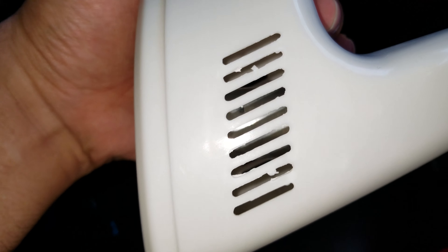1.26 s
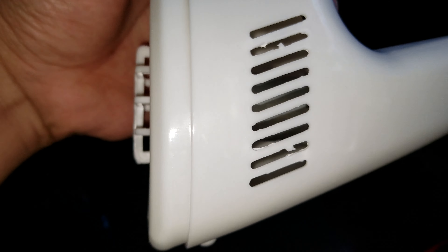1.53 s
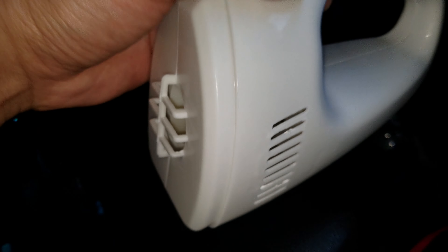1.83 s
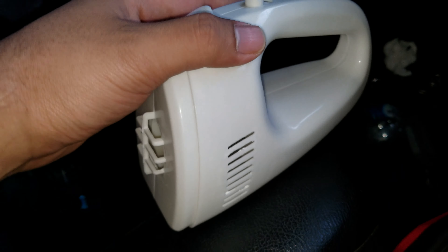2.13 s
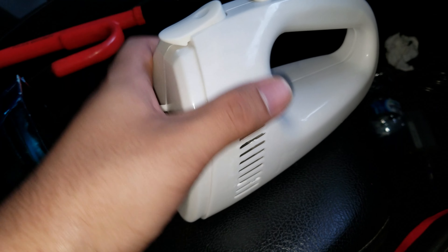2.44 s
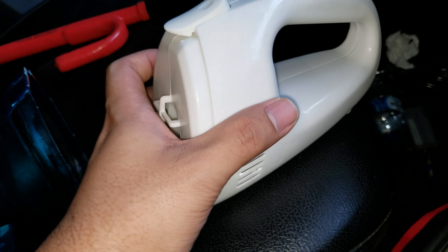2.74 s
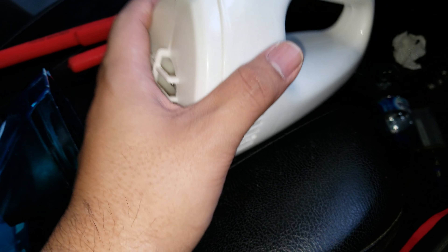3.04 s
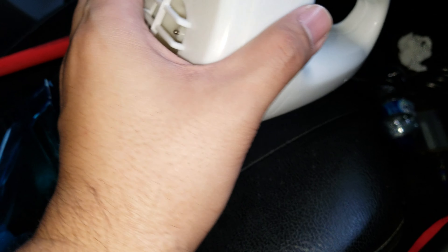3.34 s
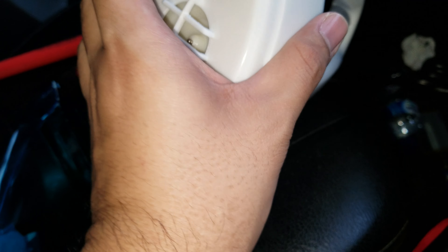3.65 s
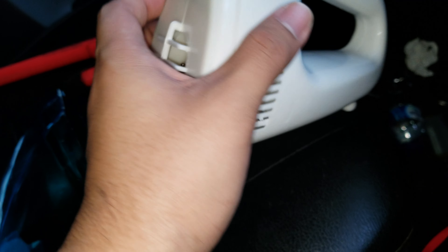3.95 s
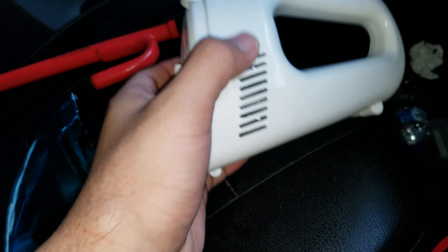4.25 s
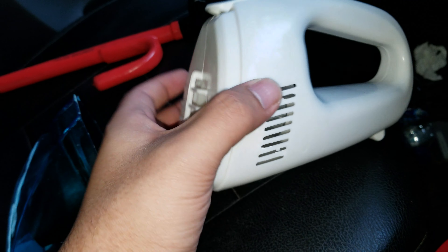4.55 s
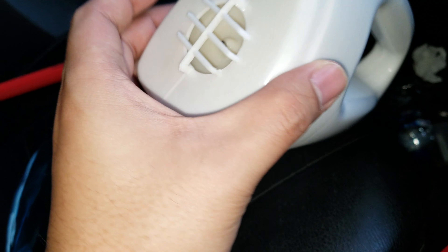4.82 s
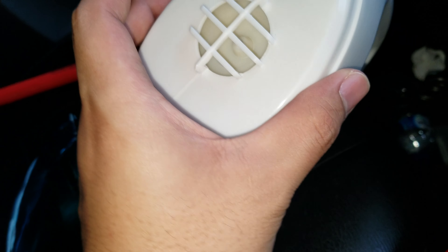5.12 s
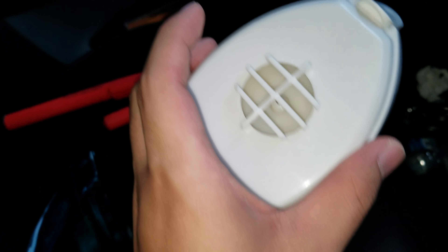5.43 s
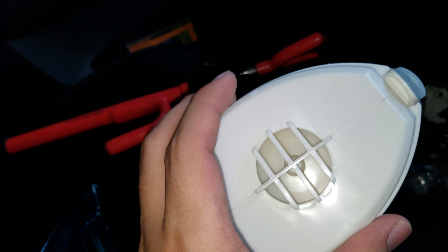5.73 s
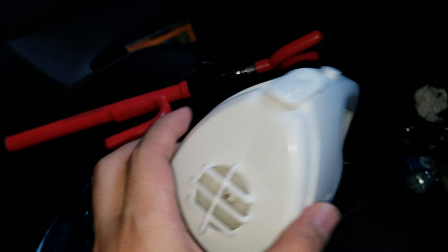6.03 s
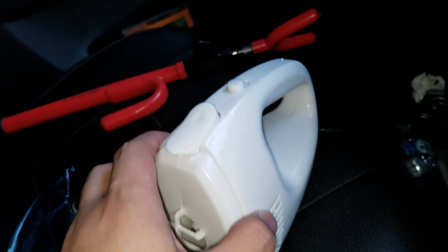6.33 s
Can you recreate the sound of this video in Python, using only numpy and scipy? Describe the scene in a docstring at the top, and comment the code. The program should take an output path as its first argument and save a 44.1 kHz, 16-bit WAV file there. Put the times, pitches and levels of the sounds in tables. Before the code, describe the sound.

A small handheld vacuum cleaner runs with rushing air and a high whine, then switches off and winds down.

```python
"""Rushing air and a high whine come from a small handheld vacuum cleaner in a parked car.
Its fan whistles and its motor hums, swelling and fading as a hand turns it near the microphone.
At first the exhaust blows across the microphone; now and then the plastic ticks in the grip.
Switched off, it coasts down: the rush dies, the motor's brushes scrape on and its tones
slide down through the pitches at which the plastic shell rings."""
import sys
import numpy as np
from scipy import signal
from scipy.fft import rfft, irfft, next_fast_len
from scipy.io import wavfile
from scipy.ndimage import uniform_filter1d

SR = 44100
rng = np.random.default_rng(int(sys.argv[2]) if len(sys.argv) > 2 else 0)


def persist_wave(psi):
    """Save psi, clipped to +-1, as 16-bit WAV."""
    counts = np.round(np.clip(psi, -1, 1) * 32767).astype(np.int16)
    wavfile.write(sys.argv[1], SR, np.atleast_2d(counts).T)


N = 435266
T = np.arange(N) / SR
PADDED = next_fast_len(N, True)
FREQ = np.maximum(np.arange(PADDED // 2 + 1) * SR / PADDED, 1)
FULL_HZ = 347.4  # turns a second of the motor's shaft at full speed

# how well the plastic shell gives off each pitch: pitch_hz, gain_db
SHELL = [(60, -24), (185, -20), (215, -18), (238, -5), (262, 1), (300, -3), (350, -10), (410, -15),
         (500, -14), (560, -19), (630, -5), (730, 1), (785, -2), (850, -20), (930, -19), (1050, -6),
         (1160, 2), (1240, -5), (1320, 3), (1380, -8), (1500, -23), (6000, -38)]


def from_db(db):
    """Turn decibels into a factor to multiply by."""
    return 10 ** (np.asarray(db) / 20)


def curves(table):
    """Join a table's rows by straight lines in time, one curve for each value column."""
    times, *columns = np.transpose(table)
    return [np.interp(T, times, column) for column in columns]


def gain_at(colour, hz):
    """Look up the gain at these pitches in rows of pitch_hz, gain_db."""
    pitches, db = np.transpose(colour)
    return from_db(np.interp(np.log(hz), np.log(pitches), db))


def filtered(x, gain):
    """Give each frequency in a sound its own gain."""
    return irfft(rfft(x, PADDED) * gain, PADDED)[..., :N]


def unit(x):
    """Scale a signal to an average strength (rms) of 1."""
    return x / np.sqrt(np.mean(x ** 2))


def coloured(x, colour):
    """Give a sound a tone colour and a strength of 1."""
    return unit(filtered(x, gain_at(colour, FREQ)))


def wobble(rate_hz):
    """A smooth random curve of strength 1 that changes about rate_hz times a second."""
    return unit(filtered(rng.standard_normal(N), 1 / (1 + (FREQ / rate_hz) ** 4)))


def stereo_noise(apart_hz):
    """Noise that is alike left and right in the bass, and unrelated far above apart_hz."""
    own_share = FREQ / (FREQ + apart_hz)
    common = filtered(rng.standard_normal(N), np.sqrt(1 - own_share))
    return common + filtered(rng.standard_normal((2, N)), np.sqrt(own_share))


def eddies(rate_hz):
    """Swirls of air: random complex numbers that shake a tone's level and timing."""
    times = np.arange(0, T[-1] + 1, 1 / rate_hz)
    return np.interp(T, times, rng.standard_normal((len(times), 2)) @ [1, 1j])


def shaft_tone(hz, turns, per_turn, flutter, wide_hz=1400):
    """A tone at a multiple of the shaft's speed; high ones reach left and right out of step."""
    shake = 1 + flutter * eddies(40)
    tone = np.sqrt(2) * np.exp(2j * np.pi * (per_turn * turns + rng.random())) * shake
    side = np.minimum(per_turn * hz / wide_hz, .8) * tone.real
    return np.array([tone.imag + side, tone.imag - side])


def cabin_echoes(x, echo_gain=0.49, right_lag_s=.00014, sway_s=0.000494, count=7):
    """Hand, seat and dashboard throw back quick echoes whose paths change as the cleaner turns."""
    sway_angle = np.interp(T, [0, 1.3, 6.4, 9.9], [0, .6, 7, 8])
    out = []
    for channel, lag_s in zip(x, (0, right_lag_s)):
        heard = np.interp(T - lag_s, T, channel)
        bounced = filtered(channel, FREQ / np.hypot(FREQ, 1900) / np.hypot(1, FREQ / 9000))
        for distance, phase in rng.random((count, 2)):
            delay_s = 0.000801 + .007 * distance + sway_s * np.sin(sway_angle + 2 * np.pi * phase)
            heard = heard + echo_gain * np.interp(T - delay_s, T, bounced)
        out.append(heard)
    return np.array(out)


def shaft_speed(off_s=7.586, wander=0.00048):
    """Turns a second: nearly steady until switch-off, then braked by fan, bearings and brushes."""
    # the shaft's speed under power: time_s, speed_hz
    powered = [(0, 344.8), (.8, 347), (2.5, 347.1), (2.95, 349.8), (3.9, 347.2), (4.6, 348.7), (5.3, 347.4),
               (5.6, 348.4), (6.4, 346.7), (7.0, 347.6), (7.58, 345.9)]
    fan_drag, bearing_drag, brush_drag = 461.5, 53.7, 27.2  # Hz lost per second at full speed
    share, step = np.linspace(1, 0, 2000, retstep=True)  # from full speed to standing still
    braking = fan_drag * share ** 2 + bearing_drag * share + brush_drag
    reached_s = off_s + np.cumsum(-step * FULL_HZ / braking)
    return curves(powered)[0] * np.interp(T, reached_s, share) * (1 + wander * wobble(5.9))


def rushing_air(octaves, turns, fall_db=22, flicker_db=0.93, throb=0.056):
    """Swirling air rings the ducts, throbs once a turn and dies quickly as the fan slows."""
    # tone colour of the air: pitch_hz, gain_db
    colour = [(40, -58.5), (120, -33.5), (190, -24.5), (255, -9), (380, -9.5), (480, -13), (600, -12),
              (820, -12), (1100, -13.5), (1600, -9), (1850, -4.5), (2150, 0), (3100, 4.5), (4500, -0.5),
              (6200, -8), (7100, -19), (8400, -26.5), (11300, -13.5), (15800, -24.5)]
    # where the ducts and the dust cup ring: pitch_hz, width_hz, boost_db
    ducts = [(581.5, 50, 8), (743, 86, 5), (1247, 200, 6), (1933, 43, 6), (2460, 250, 4), (3545, 100, 3.5),
             (4440, 310, 3), (6570, 120, 2.5), (11350, 330, 1)]
    # how squarely the rear grille faces the microphone: time_s, share (0 to 1)
    grille = [(1.4, 0.13), (3.5, 0.28), (4.6, 0.18), (5.7, 0.5), (6.3, 0), (7.5, 0.05)]
    # strength of the rush under power: time_s, upper_mids_db, treble_db
    strength = [(0.05, -25, -28.5), (0.74, -23, -27), (1.74, -22, -26), (2.08, -27, -27.5),
                (2.37, -25.5, -25.5), (2.95, -25.5, -24), (3.52, -23, -25), (4.85, -24.5, -26),
                (5.17, -22.5, -25), (5.82, -24.5, -23.5), (6.11, -26.5, -26.5), (6.4, -23, -29.5),
                (6.9, -27, -24.5), (7.55, -22.5, -22.5)]
    # middles of the four bands (body, upper mids, treble, hiss): pitch_hz
    centres = [900, 2300, 4300, 10000]
    edges_hz = [(400, 950), (1700, 2900), (3300, 6200), (7000, 15000)]
    facing = curves(grille)[0]
    boost_db = sum(db / (1 + (2 * (FREQ - hz) / width) ** 2) for hz, width, db in ducts)
    plain = filtered(cabin_echoes(stereo_noise(apart_hz=5500)), gain_at(colour, FREQ))
    ringing = filtered(plain, from_db(boost_db) - 1)
    rush = plain + (1 + 0.25 * facing) * ringing
    body_db = -34 + 6.5 * facing
    mids_db, treble_db = curves(strength)
    hiss_db = -33.5 + 0.42 * (treble_db - treble_db.mean()) + 2 * octaves
    out = 0
    for (low, high), db, pick in zip(edges_hz, [body_db, mids_db, treble_db, hiss_db], np.eye(4)):
        band_gain = np.interp(np.log(FREQ), np.log(centres), pick)  # fades into the next band
        core = filtered(rush.mean(axis=0), (FREQ > low) * (FREQ < high))
        power = uniform_filter1d(core ** 2, size=SR // 2)
        steady_band = filtered(rush, band_gain) / np.sqrt(power)
        out = out + steady_band * from_db(db + fall_db * octaves + flicker_db * wobble(25))
    return out * (1 + throb * np.sin(2 * np.pi * turns))


def duct_swells(spread=0.39):
    """Each opening sings its own narrow band of air, which swells, slides in pitch and fades."""
    # duct notes that stand out as the cleaner turns or the flow changes:
    # peak_s, half_length_s, pitch_hz, glide_hz_per_s, width_hz, level_db
    swells = [(0.455, 0.54, 2280, 123, 200, -27), (0.503, 0.95, 3790, -0.5, 260, -31),
              (0.95, 0.95, 1860, -10.5, 170, -31.5), (1.686, 0.2, 2290, -9.5, 220, -29),
              (2.352, 0.27, 2446, -6.5, 70, -25), (2.603, 0.15, 3950, 296, 240, -29),
              (3.011, 0.13, 3300, -550, 50, -24.5), (3.581, 0.44, 2448, -5, 80, -22.5),
              (3.9, 0.38, 4440, 14, 170, -33), (4.401, 0.18, 3910, -1, 280, -32),
              (4.454, 0.18, 2457, 9, 60, -23), (5.249, 0.52, 2464, 3, 140, -26),
              (5.45, 0.25, 2860, 594.5, 380, -22), (5.5, .2, 4440, 147, 258, -26.5),
              (5.81, 0.13, 4520, -100, 240, -25.5), (5.799, 0.37, 1426, 0, 300, -34),
              (7.102, 0.035, 1294, 0, 40, -26), (7.703, 0.26, 2120, -500, 309, -29.5),
              (8.1, 0.22, 2000, -76, 80, -45.5), (8.5, .14, 2380, -6, 180, -48)]
    out = np.zeros((2, N))
    noise = rng.standard_normal((2, N)) + 1j * rng.standard_normal((2, N))
    for peak_s, half_s, hz, glide, width, db in swells:
        near = np.abs(T - peak_s) < 2 * half_s
        offset_s = T[near] - peak_s
        slow_noise = signal.sosfilt(signal.butter(2, width / 2, fs=SR, output="sos"), noise[:, near])
        gliding_tone = np.exp(2j * np.pi * (hz + glide * offset_s / 2) * offset_s)
        mid, side = unit((slow_noise * gliding_tone).real)
        gain = from_db(db) * np.exp(-(offset_s / half_s) ** 2)
        out[:, near] += np.array([mid + spread * side, mid - spread * side]) * gain
    return out


def fan_whistle(hz, turns, blades=9, stall_hz=45, roughness=0.84):
    """The fan blades whistle; below working speed the flow stalls and the tone turns to a rasp."""
    # the whistle as the cleaner turns: time_s, level_db
    levels = [(0.0, -45), (1.25, -33), (2.05, -53), (2.3, -31.5), (2.75, -39), (3.1, -39), (4.0, -43.5),
              (4.15, -31.5), (4.42, -22), (4.75, -34), (4.95, -25.5), (5.35, -22), (5.95, -26), (6.2, -36),
              (6.55, -35), (6.8, -28.5), (7.05, -24), (7.25, -26.5), (7.55, -21.5)]
    # short flares of the whistle: peak_s, half_length_s, level_db
    flares = [(0.218, 0.026, -26.5), (0.597, 0.11, -28), (1.67, 0.04, -27), (3.33, 0.099, -26.5),
              (3.72, 0.12, -29.5)]
    # how it fades as it sinks, lingering where the ducts ring: pitch_hz, gain_db
    fade = [(800, -69), (1600, -47), (1900, -17), (2250, -15), (2600, -12), (2850, -36), (3080, 2)]
    gain = from_db(curves(levels)[0])
    for peak_s, half_s, db in flares:
        flare = np.exp(-np.minimum(((T - peak_s) / half_s) ** 2, 20))
        gain = np.hypot(gain, from_db(db) * flare)
    stalled = np.clip((FULL_HZ - hz) / stall_hz, 0, 1)
    jitter = .022 * stalled * wobble(70)
    tone = shaft_tone(hz, turns + jitter, per_turn=blades, flutter=0.18)
    rasp = 1 + roughness * stalled * wobble(90)
    return tone * rasp * gain * gain_at(fade, blades * hz)


def hum_gain(hz, octaves, fall_db=14):
    """How strongly the once-a-turn hum comes through the shell."""
    # the hum as the cleaner turns: time_s, level_db
    levels = [(0.0, -34), (0.6, -38), (0.7, -34), (1.95, -37), (2.12, -27.5), (2.68, -25.5), (3.01, -38),
              (3.78, -37.5), (4.36, -28), (4.83, -45), (6.31, -46), (6.35, -34.5), (6.83, -29), (7.05, -37),
              (7.14, -26.5), (7.45, -30.5)]
    shell_gain = gain_at(SHELL, hz) / gain_at(SHELL, FULL_HZ)
    return shell_gain * from_db(curves(levels)[0] + fall_db * octaves)


def motor_whine(hz, octaves, turns, core_fall_db=5, fan_fall_db=50, weak_fall_db=25):
    """The unbalanced shaft hums, the motor's spinning core sings and fainter tones lie above."""
    # the tone of the spinning core: time_s, level_db
    core = [(0.0, -31.5), (.6, -31.5), (1.35, -29), (2.1, -36.5), (2.8, -29.5), (3.85, -39.5), (4.3, -34.5),
            (4.55, -32), (4.75, -37.5), (6.0, -40), (6.3, -34.5), (6.85, -31), (7.3, -31.5), (7.55, -42),
            (7.63, -29), (7.71, -43), (7.96, -42), (8.08, -47), (8.19, -43), (8.45, -49), (8.65, -52),
            (9.12, -48), (9.27, -75)]
    # the octave above the fan's whistle: time_s, level_db
    fan_octave = [(0.0, -54.5), (0.5, -65), (1.07, -39), (1.38, -60), (4.0, -39.5), (4.12, -68.5),
                  (6.6, -33), (6.72, -54), (7.52, -36)]
    # the octave above the hum, heard mostly through the rear grille: time_s, level_db
    hum_octave = [(0, -42), (1.1, -40), (1.5, -59), (2.5, -50), (3.45, -39), (3.8, -35), (4.3, -39),
                  (5.5, -36), (6.1, -36), (6.6, -40), (7.5, -44)]
    # weaker tones under power: cycles_per_turn, level_db
    weak_tones = [(4, -52), (6, -46), (7, -44.5), (8, -48), (11, -50), (12, -42.5), (13, -56), (33, -55),
                  (36, -63)]
    core_gain = from_db(curves(core)[0] + core_fall_db * octaves)
    fan_gain = from_db(curves(fan_octave)[0] + fan_fall_db * octaves)
    out = shaft_tone(hz, turns, per_turn=1, flutter=0.12, wide_hz=1300) * hum_gain(hz, octaves)
    out += shaft_tone(hz, turns, per_turn=3, flutter=0.19, wide_hz=1500) * core_gain
    out += shaft_tone(hz, turns, per_turn=18, flutter=.3) * fan_gain
    weak = sum(shaft_tone(hz, turns, k, flutter=0.46) * from_db(db) for k, db in weak_tones)
    weak += shaft_tone(hz, turns, per_turn=2, flutter=.2) * from_db(curves(hum_octave)[0])
    return out + weak * from_db(weak_fall_db * octaves)


def recorder_side_tone(hz, octaves, turns, below_hz=187.5, relative_db=-29):
    """The recorder adds a faint low tone a fixed distance under the hum; it fades as the hum sinks."""
    fade = np.clip((hz - below_hz) / 60, 0, 1)
    gain = hum_gain(hz, octaves) * from_db(relative_db) * fade
    return gain * np.sin(2 * np.pi * (turns - below_hz * T))


def magnet_tones(hz, octaves, turns, fall_db=5.5):
    """Magnets tug at the spinning core; each tone swells as it passes a pitch where the shell rings."""
    # magnet and bearing tones at full speed, before the shell: cycles_per_turn, level_db
    tones = [(2, -47), (4, -43), (5, -52), (6, -45), (7, -46), (8, -48), (9, -37.5), (10, -45.5), (11, -50),
             (12, -49), (14, -50.5), (15, -40), (16, -50), (17, -51.5), (21, -50)]
    out = 0
    for per_turn, db in tones:
        tone = shaft_tone(hz, turns, per_turn, flutter=.25)
        out = out + tone * from_db(db) * gain_at(SHELL, per_turn * hz)
    return out * from_db(fall_db * octaves)


def rub_gain(hz, level_db, hold_hz, fall_db):
    """A rubbing part keeps its level until the shaft slows to hold_hz, then fades."""
    return from_db(level_db + fall_db * np.minimum(np.log2(hz / hold_hz), 0))


def brushes_and_bearings(hz, turns, bite=0.23, knock=0.27, crawl_db=-60.5, bounce_stop_hz=60):
    """Brushes scrape over three gaps in the motor's contact ring; bearings rumble once a turn."""
    # tone colour of the bearings' rumble: pitch_hz, gain_db
    rumble_colour = [(60, -30), (185, -17.5), (235, -4), (350, -4), (560, -6), (770, 3.5), (880, -2.5),
                     (1150, -6), (1330, 0.5), (1450, -10.5), (1600, -16), (6000, -39)]
    # tone colour of the brushes' scrape: pitch_hz, gain_db
    scrape_colour = [(1500, -34), (2800, -12), (3300, 2), (4700, 1), (5800, -1.5), (6450, -10),
                     (8500, -20.5), (10500, -11.5), (11700, -14.5), (12600, -17), (16000, -26.5)]
    # tone colour of their chatter: pitch_hz, gain_db
    chatter_colour = [(900, -31), (1500, -8.5), (1950, 2), (2150, 1.5), (2380, 4), (2650, -0.5), (3200, -1),
                      (4500, -16), (9000, -38)]
    # tone colour of the contact ring's thin sizzle: pitch_hz, gain_db
    sizzle_colour = [(4000, -38), (5400, -9), (6000, 8.5), (6400, -17), (8500, -42), (11100, -23),
                     (11650, -12), (12200, -24), (16000, -38)]
    gaps = unit(np.exp(bite * np.cos(2 * np.pi * 3 * turns)))
    rub = unit(np.exp(knock * np.cos(2 * np.pi * turns)))
    rumble = coloured(stereo_noise(apart_hz=5000) * rub, rumble_colour)
    rumble *= rub_gain(hz, level_db=-37.5, hold_hz=198, fall_db=13.7)
    scrape = coloured(cabin_echoes(stereo_noise(apart_hz=6000) * gaps * rub), scrape_colour)
    scrape *= np.hypot(rub_gain(hz, level_db=-33, hold_hz=217, fall_db=16), from_db(crawl_db))
    chatter = coloured(stereo_noise(apart_hz=1200) * rub, chatter_colour)
    chatter *= rub_gain(hz, level_db=-44, hold_hz=168, fall_db=12.8)
    sizzle = coloured(stereo_noise(apart_hz=6000) * gaps * rub, sizzle_colour)
    sizzle *= rub_gain(hz, level_db=-47, hold_hz=175, fall_db=16)
    bouncing = 1 / (1 + (bounce_stop_hz / hz) ** 14)
    return rumble + scrape + (chatter + sizzle) * bouncing


def quiet_car(level_db=-63.5):
    """The faint, steady background noise inside the parked car."""
    # tone colour of the background: pitch_hz, gain_db
    colour = [(25, -11), (55, -9), (120, -6), (300, -26), (800, -19.5), (2000, -28.5), (7000, -18.5),
              (12000, -18.5), (16000, -19)]
    return coloured(stereo_noise(apart_hz=200), colour) * from_db(level_db)


def exhaust_wind(fade_db_per_s=50, lean_left_db=4.0):
    """The side vent blows on the microphone twice, more on the left, fading as it turns away."""
    # tone colour of the wind: pitch_hz, gain_db
    colour = [(25, -26.5), (60, -8.5), (110, -5), (250, 3), (400, -0.5), (900, -25), (4000, -56)]
    wind = coloured(stereo_noise(apart_hz=16), colour)
    blowing = 0
    for start_s, end_s, level_db in [(0, 1.47, -35.5), (4.45, 4.5, -44.5)]:
        away_s = np.abs(T - np.clip(T, start_s, end_s))
        blowing = blowing + from_db(level_db - fade_db_per_s * away_s)
    return wind * blowing * from_db([[lean_left_db], [-lean_left_db]])


def plastic_ticks():
    """The plastic ticks and creaks in the hand: tiny bursts of noise that die at once."""
    # the ticks: start_s, level_db, decay_s
    ticks = [(2.04, -29, .002), (9.082, -41, .0015), (9.097, -43, .0015), (9.358, -52, .008),
             (9.37, -52, 0.012)]
    # tone colour of the plastic: pitch_hz, gain_db
    colour = [(100, -20), (350, 0), (1400, -2), (2200, 1), (4000, 1), (6500, -19), (15000, -28)]
    bursts = sum(from_db(db) * (T >= s) * np.exp(-np.abs(T - s) / decay) for s, db, decay in ticks)
    return coloured(stereo_noise(apart_hz=2510), colour) * bursts


def shell_ring(start_s=9.358, pitch_hz=764, level_db=-41.5, attack_s=0.017, decay_s=0.11):
    """The shell rings briefly as the slowing motor's tones slide through its pitch."""
    age = np.maximum(T - start_s, 0)
    envelope = (1 - np.exp(-age / attack_s)) * np.exp(-age / decay_s)
    return from_db(level_db) * np.sin(2 * np.pi * pitch_hz * age) * envelope


def scene():
    """One shaft drives fan and motor; the recorder's side tone, car, wind and ticks join them."""
    hz = shaft_speed()
    turns = np.cumsum(hz) / SR
    octaves = np.log2(hz / FULL_HZ)  # -1 at half speed; every fall_db is the drop per halving
    cleaner = rushing_air(octaves, turns) + duct_swells() + fan_whistle(hz, turns)
    cleaner += motor_whine(hz, octaves, turns) + magnet_tones(hz, octaves, turns)
    cleaner += brushes_and_bearings(hz, turns) + shell_ring()
    side_tone = recorder_side_tone(hz, octaves, turns)
    return cleaner + side_tone + quiet_car() + exhaust_wind() + plastic_ticks()


def record(dry, ceiling=.9, top_hz=15800):
    """The microphone is brighter on the left, rounds the highest peaks and cuts the very top."""
    left_colour = [(300, .1), (700, 0.69), (2500, 0.24), (5500, 0.49), (9000, 3.0), (14000, 0.91)]
    left_gain = gain_at(left_colour, FREQ)
    heard = filtered(dry, np.array([left_gain, 1 / left_gain]))
    rounded = heard / (1 + (heard / ceiling) ** 6) ** (1 / 6)
    top_cut = 1 / np.sqrt(1 + (FREQ / top_hz) ** 300)
    return filtered(rounded, top_cut)


dry = scene()
out = record(dry)
persist_wave(out)
```